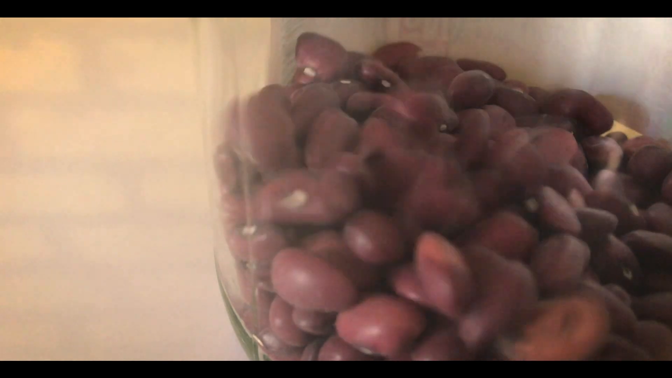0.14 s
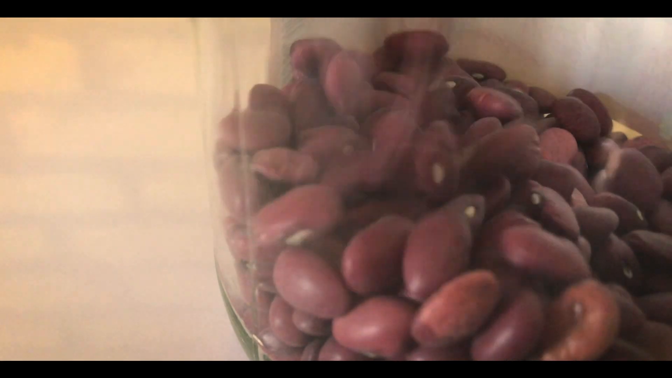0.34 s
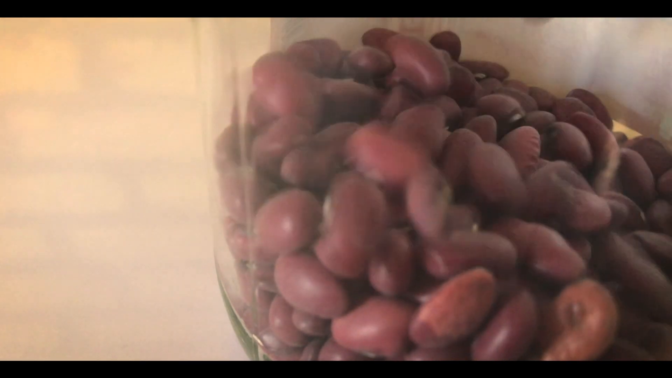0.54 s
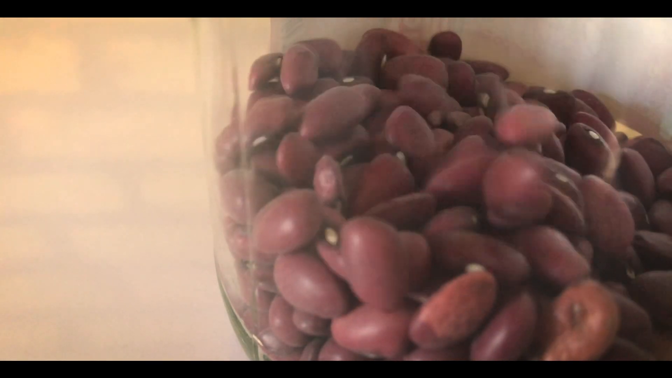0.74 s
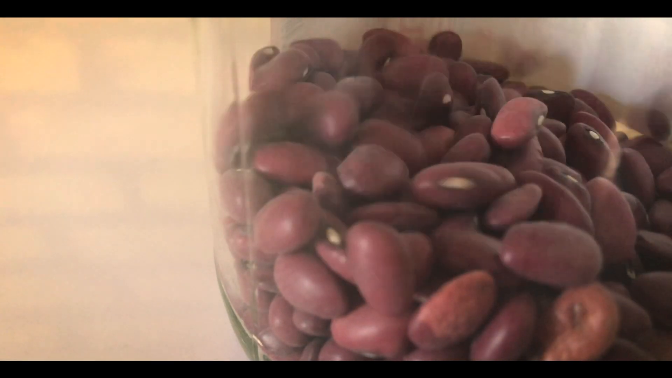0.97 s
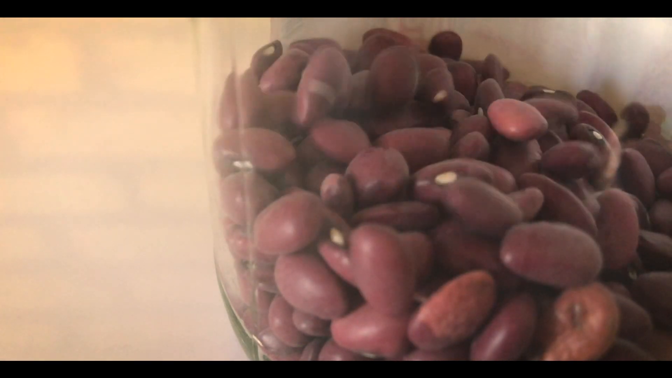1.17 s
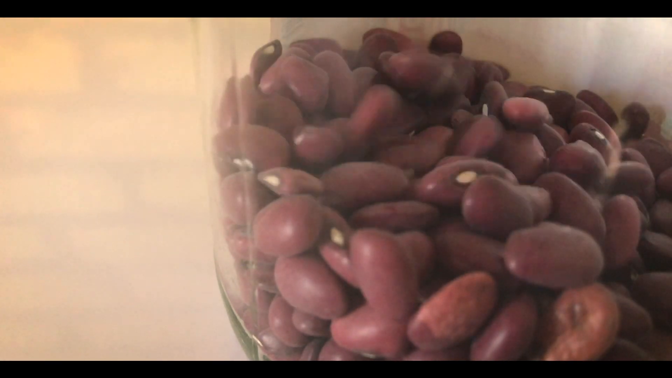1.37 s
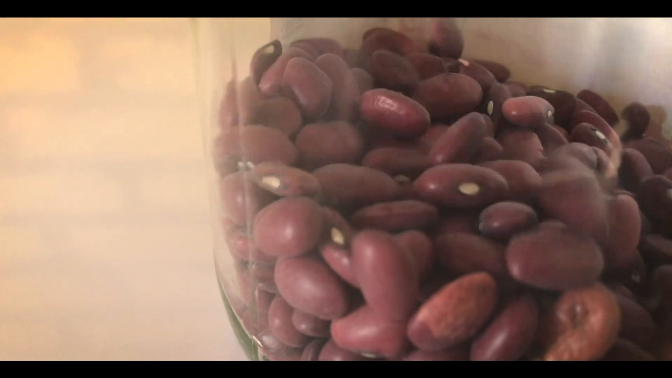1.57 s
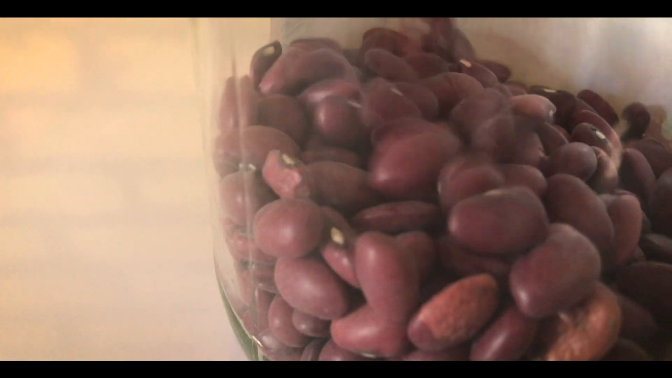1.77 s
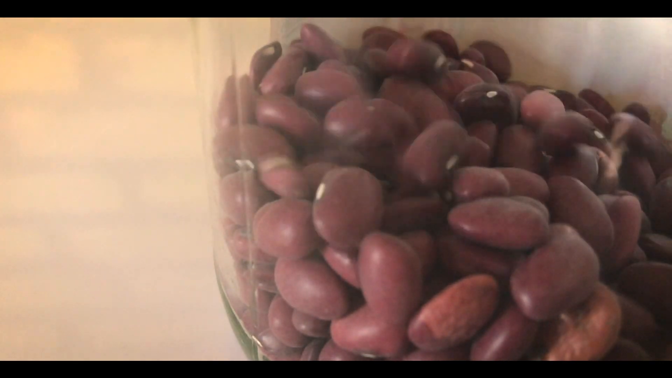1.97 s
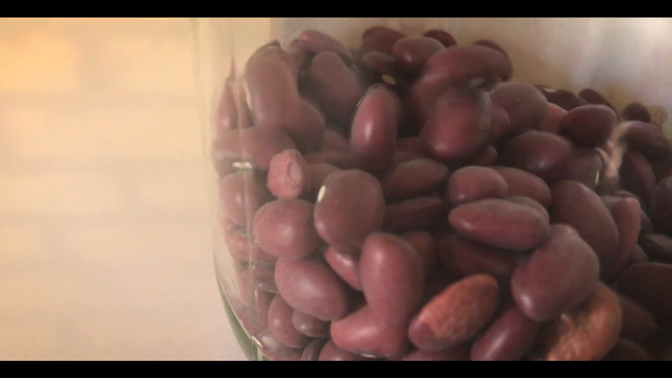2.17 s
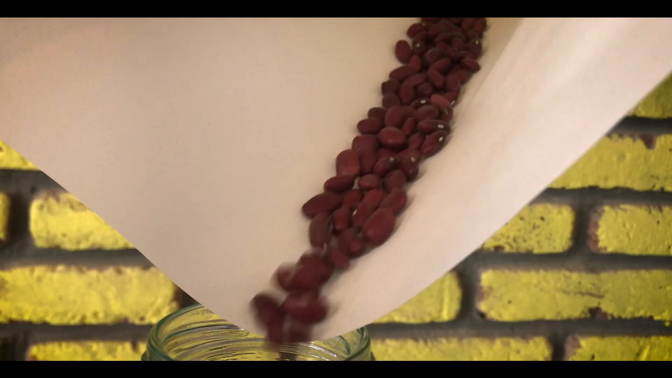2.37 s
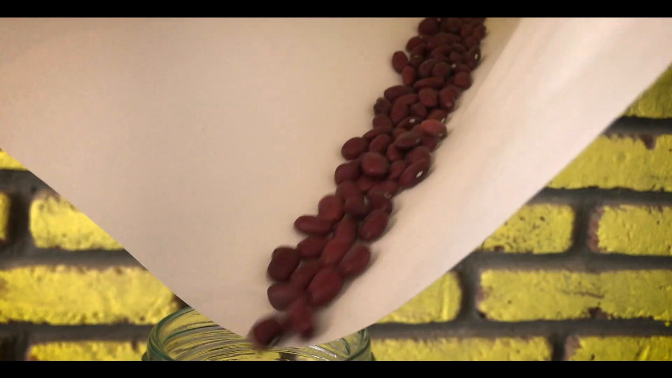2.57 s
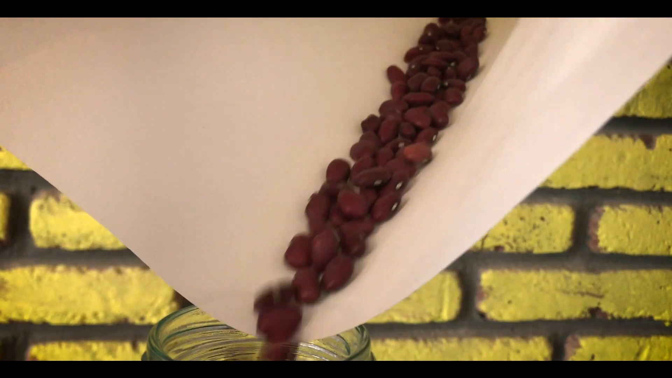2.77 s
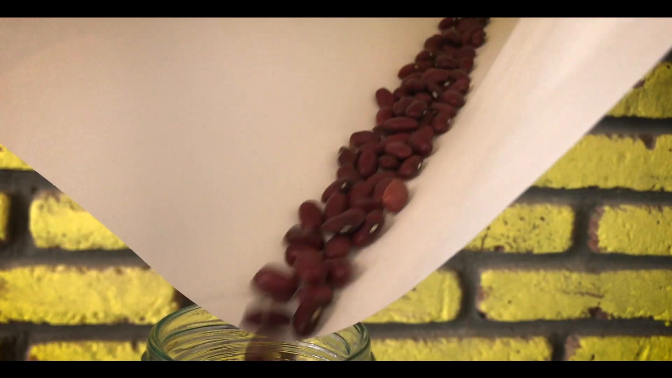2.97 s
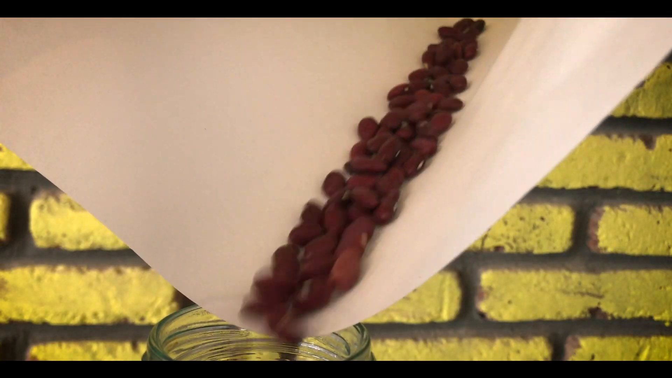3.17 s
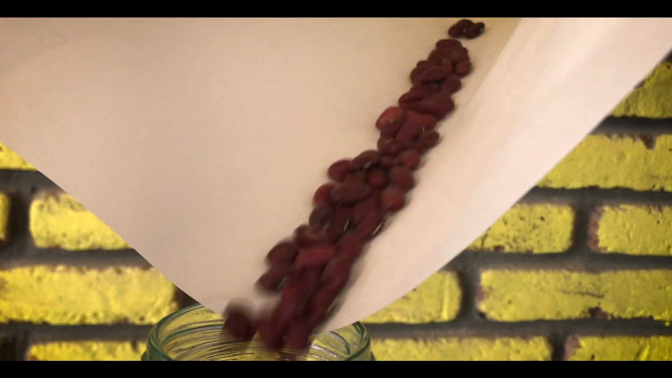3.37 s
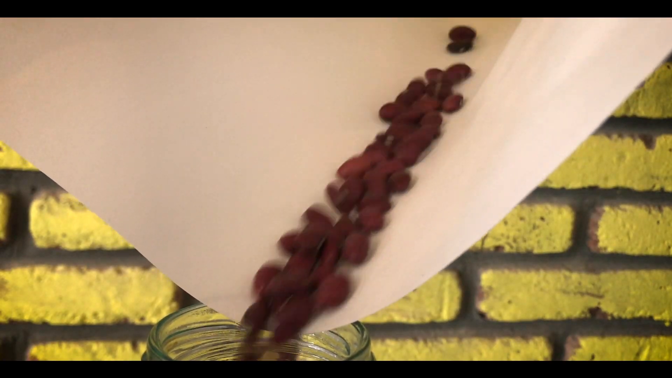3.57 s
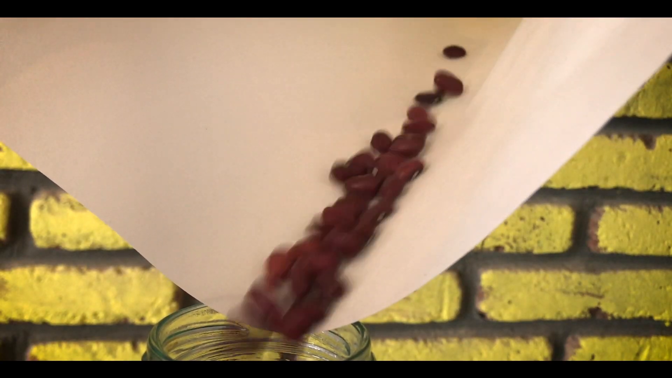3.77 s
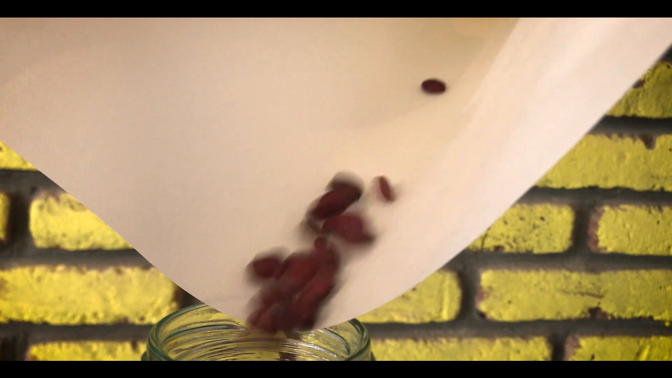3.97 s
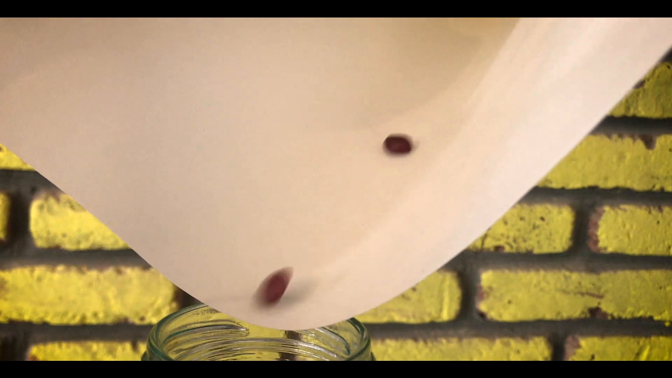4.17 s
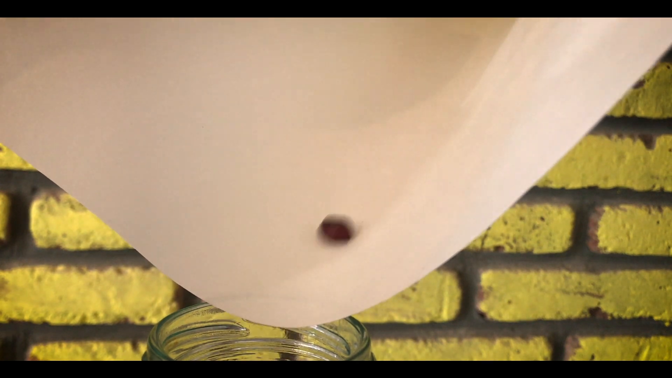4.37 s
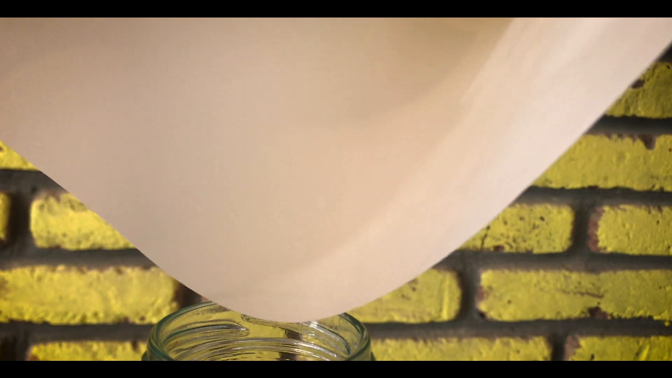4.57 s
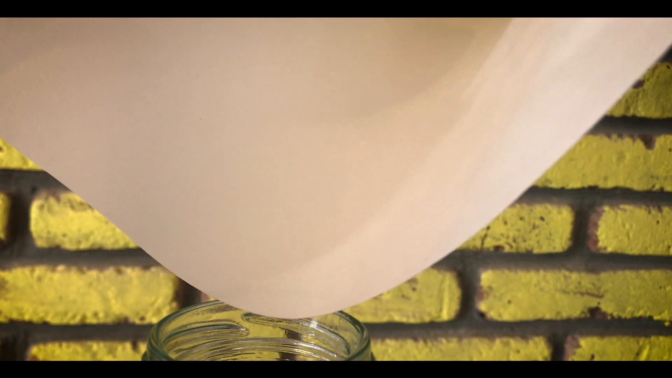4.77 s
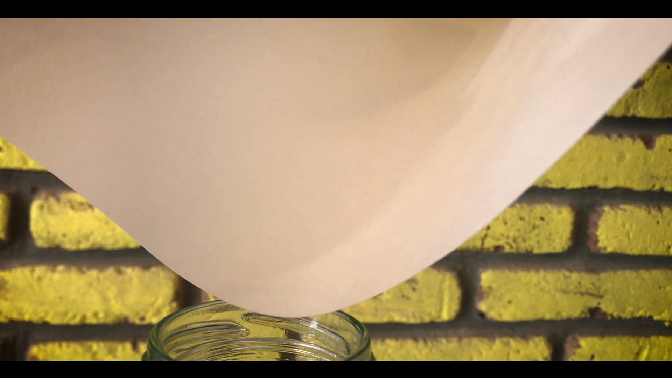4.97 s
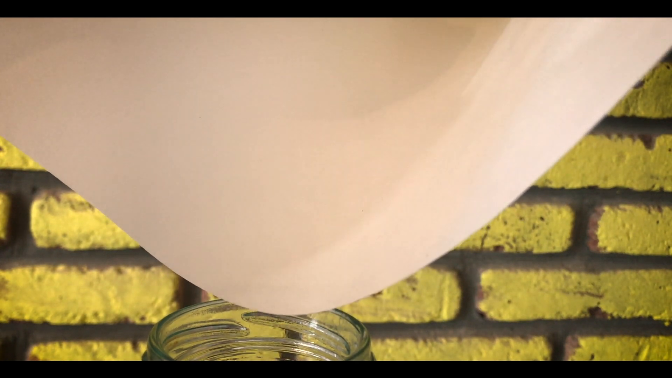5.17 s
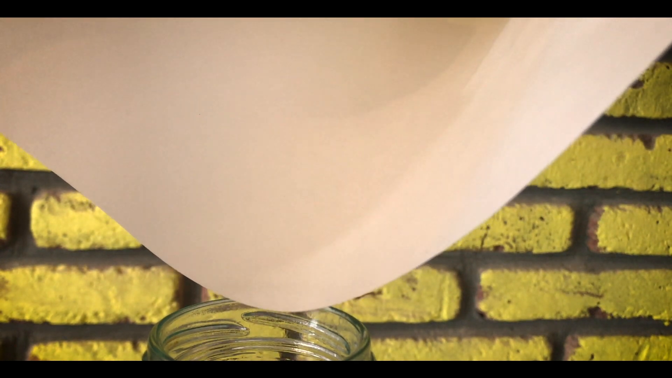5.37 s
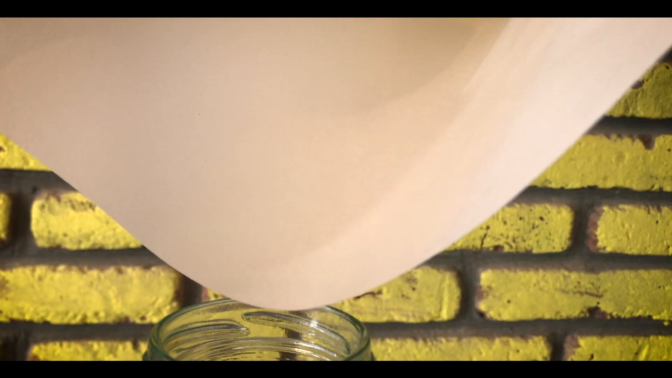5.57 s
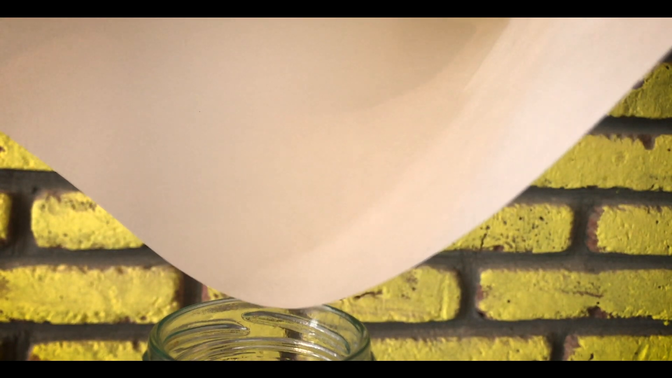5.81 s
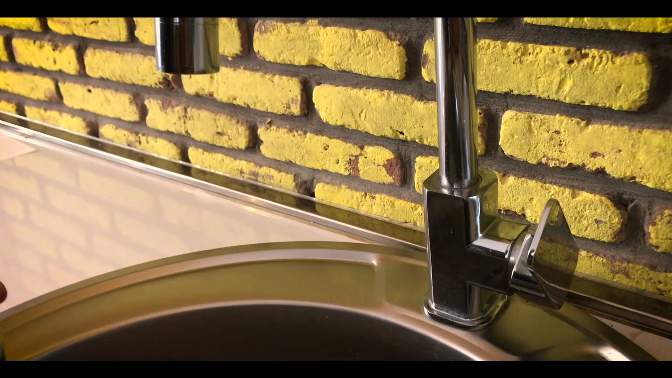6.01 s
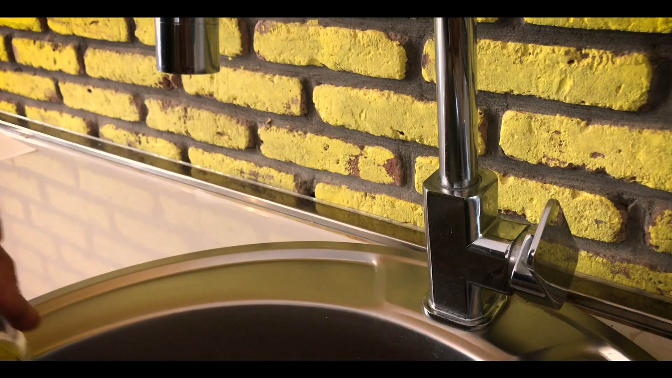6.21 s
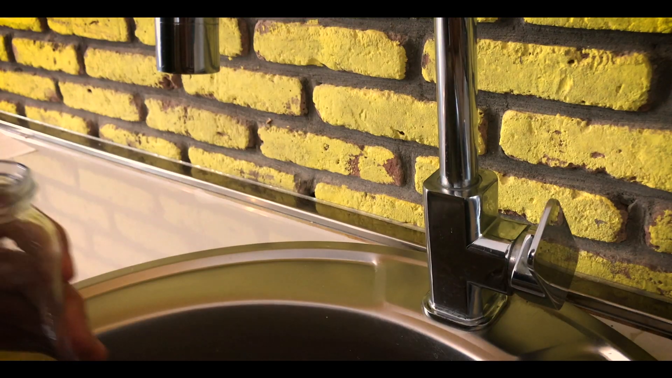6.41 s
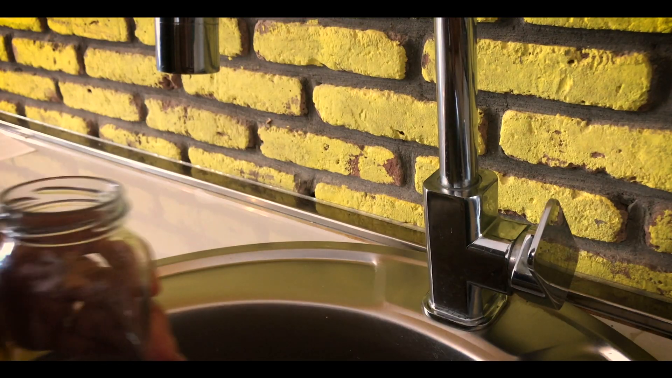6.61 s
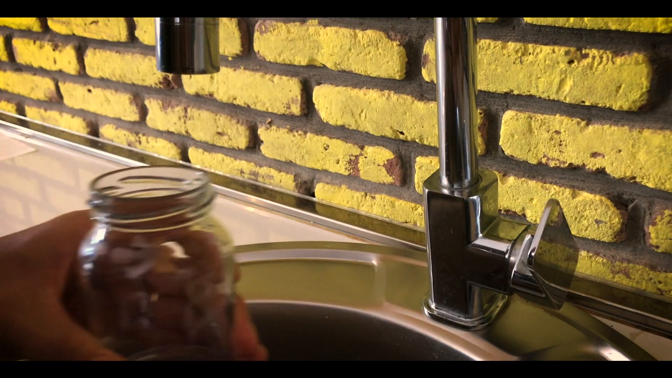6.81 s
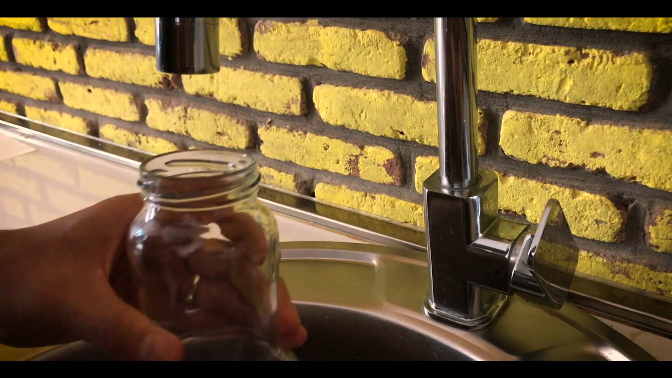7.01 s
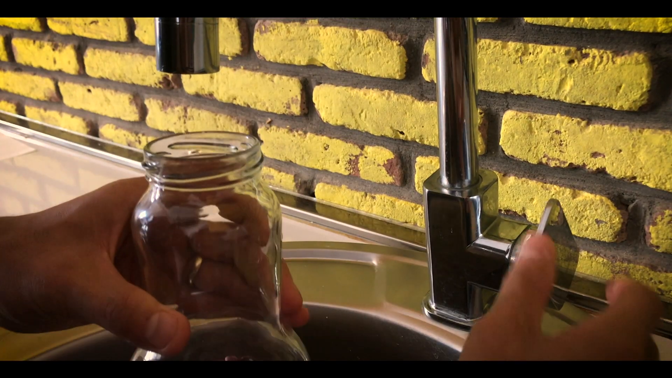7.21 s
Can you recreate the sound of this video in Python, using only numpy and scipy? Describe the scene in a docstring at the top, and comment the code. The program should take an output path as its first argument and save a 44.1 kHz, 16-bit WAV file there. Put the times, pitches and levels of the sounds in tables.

```python
"""Beans poured into a glass jar

Dried kidney beans are poured into a glass jar in a small kitchen. First, by the jar's side, beans clink on
the glass (ringing modes and a noise crack) and thud into a rattling pile (low jar modes and noise bursts).
Then, by its mouth, they slide down a paper chute (showers of tiny noise bursts) and tick against the neck
until a last one drops and bounces. Faint hand brushing and room rumble (filtered noise) and hums remain."""
import sys
import numpy as np
from scipy import signal
from scipy.fft import rfft, irfft
from scipy.io import wavfile

SR = 44100
rng = np.random.default_rng(int(sys.argv[2]) if len(sys.argv) > 2 else 0)


def master(y):
    """Save y as 16-bit WAV."""
    cut = np.clip(np.atleast_2d(y).T, -1, 1)
    pcm = np.round(cut * 32767)  # scale
    wavfile.write(sys.argv[1], SR, pcm.astype(np.int16))


N = 319719
T = np.arange(N) / SR
RING_T = T[:SR // 6]  # every single ring or burst is cut off after a sixth of a second

# In all tables, levels are those before the final mix, room and filters.
# Mode and colour levels are relative: they set the balance inside one sound. t60_s is the time to fall 60 dB.

# beans striking the side of the jar: start_s, peak_db (approximate), treble_share_db
SIDE_HITS = [(0.0275, -7, -8), (0.0413, -15, -17), (0.0669, -7.5, -12), (0.0945, -6.5, -8),
             (0.1173, -6.5, -17.5), (0.1329, -12, -17), (0.144, -4.5, -12), (0.1766, -16.5, -7),
             (0.1985, -8, -15.5), (0.2295, -12.5, -10), (0.259, -9, -11), (0.275, -16.5, -34),
             (0.2825, -11.5, -16.5), (0.2987, -6, -7), (0.3398, -5.5, -15.5), (0.3904, -13, -23),
             (0.4333, -7, -18.5), (0.4638, -9.5, -13), (0.4772, -3.5, -8), (0.5495, -12.5, -17.5),
             (0.579, -16, -17), (0.595, -16.5, -30), (0.6164, -22.5, -28), (0.63, -17, -19),
             (0.7004, -17.5, -18.5), (0.8043, -27.5, -44), (0.821, -28.5, -15), (0.8932, -24.5, -6),
             (0.9173, -9.5, -19), (0.9294, -23, -22), (0.9632, -29.5, -12), (0.9941, -9, -17.5),
             (0.9999, -3, -12), (1.0245, -12, -13), (1.0349, -10, -3), (1.0532, -5, -10),
             (1.0881, -16.5, -29), (1.1491, -6.5, -14.5), (1.2329, -15.5, -18.5), (1.4021, -19, -23.5),
             (1.4698, -26, -12), (1.548, -21.5, -20), (1.571, -19.5, -16.5), (1.6247, -26, -4),
             (1.6611, -9.5, -17), (1.675, -20, -12), (1.7174, -20, -22), (1.7374, -22.5, -21),
             (1.7512, -8, -28), (1.8587, -21.5, -4), (1.8865, -5.5, -19.5), (1.9297, -28, -17),
             (2.0098, -26, -25), (2.0741, -29.5, -25), (2.0886, -23, -20), (2.155, -12, -15),
             (2.1671, -10.5, -18.5), (2.1986, -29.5, -12), (2.264, -28, -27), (2.2755, 0, -13.5),
             (2.294, -17, -13), (2.3355, -26.5, -32), (2.386, -30.5, -17), (2.4358, -12.5, -9)]
# ringing of the glass wall, damped by the beans behind it: pitch_hz, level_db, t60_s
SIDE_MODES = [(2633, -18, .14), (2746, -11, .13), (3214, -2.7, .08), (3897, -7, .08), (4892, 0, .055),
              (6718, -15, .1), (6965, -4, .05), (7390, 0, .04), (7445, 2, .06), (8678, -6, .05),
              (8998, 0, .045), (9430, -13, .05), (10520, -7, .07), (10740, -7, .04), (11470, -13, .06),
              (11615, -6, .04), (11955, 1, .065), (14170, -9, .05), (14370, -13, .07), (14920, -6, .04),
              (15230, -12, .06), (15575, -11, .06)]
# colour of the contact crack, shaped by the wall: frequency_hz, level_db
SIDE_CRACK = [(2200, -25), (3000, -4), (7200, -2.5), (8050, -12), (8900, 5), (9900, -9.5), (11600, 4),
              (13000, -11), (15000, 6.5)]
# colour of the rattling pile: frequency_hz, level_db
PILE_COLOUR = [(40, -26), (260, -1.5), (355, 3), (430, -9), (560, -8.5), (800, -2.5), (1600, -5.5),
               (2300, -2.5), (4500, -6.5), (8000, -14.5)]
SIDE_TREBLE_DB = -14  # treble share of an ordinary blow on the side


def jar_side():
    """Beans clink on the wall, hard or glancing, over the rattle of the settling pile."""
    rattle_gain, graze_gain = pile_flow()
    blows = rocking(strikes(SIDE_HITS, SIDE_TREBLE_DB), second_db=-13)
    clinks = glass(blows, SIDE_MODES, SIDE_CRACK, scatter_db=3.8, detune=.002,
                   crack_db=-6, crack_t60=.036, tick_db=-2.5, linger_db=-31)
    light = light_hits(.02, 2.42, count=140, loudness=graze_gain, spread_db=2.0, dull_db=4.5)
    grazes = glass(light, SIDE_MODES, SIDE_CRACK, scatter_db=4.5, detune=.0024,
                   crack_db=-14, crack_t60=.018, tick_db=-3, linger_db=-23)
    rattle = colour(contacts(rate=400, spread_db=2.2, t60=.02, rubbing=.25), PILE_COLOUR)
    return clinks + grazes + rattle_gain * rattle


# a first rush dies away to a trickle, which slowly thickens again
RUSH_END_S, RUSH_FALL_DB_PER_S = 0.43, 62
TRICKLE_DB, TRICKLE_RISE_DB_PER_S = -32, 10  # flow at 0 s, compared with the rush
SIDE_END_S, SIDE_FALL_DB_PER_S = 2.43, 450
RATTLE_DB, RATTLE_PER_DB = -45, 0.17  # rattle in the rush; its change for each dB of flow
GRAZE_DB = -30.5  # glancing blows on the wall in the rush


def pile_flow():
    """The flow of beans sets the pile's rattle and, more steeply, the glancing blows: two gain curves."""
    rush_db = -RUSH_FALL_DB_PER_S * np.maximum(T - RUSH_END_S, 0)
    flow_db = np.maximum(rush_db, TRICKLE_DB + TRICKLE_RISE_DB_PER_S * T)
    near_db = hold_db(0, SIDE_END_S, 0, SIDE_FALL_DB_PER_S)
    return undb(RATTLE_DB + RATTLE_PER_DB * flow_db + near_db), undb(GRAZE_DB + flow_db + near_db)


CREST_DB = 10.5  # peak of a clink over the level of its first 5 ms
# upward tilt (per 4 kHz) for each dB of treble share above the ordinary; the most tilt a blow may have
TILT_PER_DB, MAX_TILT_DB = 0.74, 0


def strikes(table, ordinary_db):
    """A harder contact has more treble, up to a limit: rows of start_s, level_db, brightness_db."""
    s, peak_db, treble_db = np.transpose(table)
    bright_db = np.minimum(TILT_PER_DB * (treble_db - ordinary_db), MAX_TILT_DB)
    return np.column_stack([s, peak_db - CREST_DB, bright_db])


def rocking(hits, second_db):
    """An oblong bean lands on one end and slaps down, softer and duller, with the other a few ms later."""
    first = np.array(hits)
    delay_s = rng.uniform(.002, .006, len(first))
    second = first + np.outer(delay_s, [1, 0, 0]) + [0, second_db, -1]
    return np.vstack([first, second])


def glass(hits, modes, crack_colour, scatter_db, detune, crack_db, crack_t60, tick_db, linger_db):
    """Each bean strikes another spot, so it weights and detunes the modes anew and adds a noisy crack."""
    hz, db, t60 = np.transpose(modes)
    # the beans soak up most of the ring at once; a weak part lingers in the bare glass
    decays = np.float32([fade(t) + undb(linger_db) * fade(3 * t) for t in t60])
    # a soft contact drives all the low modes alike and loses only the high ones
    height = (np.maximum(hz, 4500) - 8000) / 4000
    attack = int(.005 * SR)
    # the crack starts with a sharp tick
    crack_shape = undb(crack_db) * fade(crack_t60) + undb(tick_db) * fade(.003)
    out = np.zeros(N)
    for s, level_db, bright_db in hits:
        spot, load, sign = rng.standard_normal((3, len(hz)))
        # a long, soft push cancels the treble faster than a short one raises it
        slope_db = bright_db + .5 * min(bright_db, 0)
        weight = undb(db + slope_db * height + scatter_db * spot) * np.sign(sign)
        turn_per_s = np.float32(2 * np.pi * hz * (1 + detune * load))
        rings = np.sin(np.outer(turn_per_s, np.float32(RING_T))) * decays
        ringing = np.float32(weight / np.linalg.norm(weight)) @ rings
        crack = colour(crack_shape * rng.standard_normal(len(RING_T)), crack_colour)
        clink = ringing + undb(min(slope_db, 0)) * crack
        add(out, s, clink * undb(level_db) / np.std(clink[:attack]))
    # the clinks carry little sound below about 1.9 kHz
    return low_cut(out, 1900)


# heavy landings on the pile: start_s, level_db
THUDS = [(0.172, -31.5), (0.625, -31.5), (0.651, -33.5), (0.752, -32.5), (0.82, -33), (0.888, -34),
         (0.929, -33.5), (1.167, -33), (1.233, -33.5), (1.378, -27), (1.402, -36), (1.545, -29.5),
         (1.624, -30), (1.652, -28), (1.713, -35), (1.814, -32.5), (1.926, -33.5), (2.046, -32.5),
         (2.111, -32.5), (2.197, -28)]
# ringing of the filled jar as a whole: pitch_hz, level_db, t60_s
BODY_MODES = [(84, -7.5, .16), (149, -7, 0.13), (258.4, -6, 0.17), (360.4, -4, .24), (508.4, 0, 0.08),
              (582.8, 0.5, 0.076), (641, -2.5, 0.077), (1030, 0.5, 0.029)]
# colour of the shifting pile: frequency_hz, level_db
THUD_COLOUR = [(35, -24.5), (75, -5), (580, 0.5), (6000, -30.5)]
KNOCK_DB = -30.5  # a blow on the wall also knocks the whole jar, this far under its peak


def pile_thuds():
    """Beans landing on the pile or wall knock the jar's low modes and shift the pile; lighter ones patter."""
    hz, mode_db, t60 = np.transpose(BODY_MODES)
    decays = np.array([fade(t) for t in t60])
    body, shift = np.zeros(N), np.zeros(N)
    patter_gain = undb(5.5) * pile_flow()[0]
    patter = light_hits(0, 2.4, count=60, loudness=patter_gain, spread_db=0.0, dull_db=0)[:, :2]
    knocks = [(s, db + KNOCK_DB) for s, db, _ in SIDE_HITS]
    for s, db in np.vstack([THUDS, knocks, patter]):
        spot, load, sign = rng.standard_normal((3, len(hz)))
        weight = undb(mode_db + 2 * spot) * np.sign(sign)
        rings = np.sin(2 * np.pi * np.outer(hz * (1 + .02 * load), RING_T)) * decays
        # both begin 2 ms after the listed moment
        add(body, s + .002, undb(db) * weight / np.linalg.norm(weight) @ rings)
        add(shift, s + .002, undb(db) * fade(.053) * rng.standard_normal(len(RING_T)))
    thuds = undb(-4.5) * body + undb(-12.0) * colour(shift, THUD_COLOUR)
    return low_cut(thuds, 65)


# beans dropping onto the paper: start_s, level_db
PAPER_TAPS = [(3.051, -41), (3.913, -32.5), (4.208, -34.5), (4.725, -51.5)]
# colours of the jostling beans, of their scraping and of the drumming sheet: frequency_hz, level_db
RUSTLE_COLOUR = [(900, -17), (2000, -0.5), (3000, 3.5), (5000, 1), (7000, 2), (7900, -4), (9000, 3.5),
                 (10000, -5), (12000, 0.5), (15500, -0.5)]
SCRAPE_COLOUR = [(400, -3), (1000, 4), (2200, 4), (3200, -17.5), (6000, -7.5)]
SHEET_COLOUR = [(60, -17), (170, -5), (262, 2.5), (335, -9.5), (600, -9), (1500, -45.5)]
# ringing of the glass around the open mouth: pitch_hz, level_db, t60_s
NECK_MODES = [(2660, -11, .08), (2775, -10, .07), (3250, -8, .09), (3885, -9, .08), (4035, -8, .07),
              (4960, -7, .06), (6350, -6, .06), (6860, -7, .035), (7500, -10, .05), (8780, -5, .04),
              (9510, -12, .05), (10700, -5, .03), (11530, 0, .04), (11800, 1, .035), (12400, -5, .025),
              (13020, -2, .03), (14000, 0, .04), (14200, -4, .04), (15260, -1, .04), (15585, -2, .05)]
# colour of the contact crack, shaped by the neck: frequency_hz, level_db
NECK_CRACK = [(700, -22), (2600, -7), (15500, 5)]


def chute():
    """Beans jostle and scrape down the sheet, which drums under them; at its lip they graze the neck."""
    rustle_gain, scrape_gain, drum_gain = chute_flow()
    jostling = contacts(rate=600, spread_db=2.2, t60=.025, rubbing=.2)
    sliding = rustle_gain * colour(jostling, RUSTLE_COLOUR)
    paper = scrape_gain * contacts(rate=800, spread_db=2, t60=.022, rubbing=.3)
    for s, db in PAPER_TAPS:
        add(paper, s, undb(db) * fade(.086) * rng.standard_normal(len(RING_T)))
    sheet = drum_gain * colour(contacts(rate=220, spread_db=2.5, t60=.019), SHEET_COLOUR)
    light = light_hits(2.4, 4.54, count=100, loudness=undb(-2) * rustle_gain, spread_db=0.0, dull_db=2.5)
    grazes = glass(light, NECK_MODES, NECK_CRACK, scatter_db=4, detune=.008,
                   crack_db=-3, crack_t60=.025, tick_db=0, linger_db=-24)
    return sliding + colour(paper, SCRAPE_COLOUR) + sheet + grazes


# the stream swells, holds and runs out; one straggler then slides down alone
CHUTE_START_S, CHUTE_FULL_S, CHUTE_SWELL_DB_PER_S = 2.45, 3.11, 7
START_DB_PER_S, STOP_DB_PER_S = 447.5, 261  # how fast sliding starts and stops
LIP_EMPTY_S, LIP_FALL_DB_PER_S = 3.84, 23.5  # the tumbling at the lip thins out
SHEET_EMPTY_S, SHEET_FALL_DB_PER_S = 4.08, 136  # the last of the stream leaves the paper
STRAGGLER_DB, STRAGGLER_OFF_S = -11, 4.53  # scrape of the straggler, compared with the full stream
DRUM_END_S, DRUM_FALL_DB_PER_S = 4.35, 82
RUSTLE_DB, SCRAPE_DB, DRUM_DB = -35.5, -43.5, -53  # levels at full flow


def chute_flow():
    """One stream drives rustle, scrape and drumming, which die away in turn: three gain curves."""
    sliding_db = hold_db(CHUTE_START_S, STRAGGLER_OFF_S, START_DB_PER_S, STOP_DB_PER_S)
    lip_db = hold_db(CHUTE_FULL_S, LIP_EMPTY_S, CHUTE_SWELL_DB_PER_S, LIP_FALL_DB_PER_S)
    stream_db = hold_db(CHUTE_FULL_S, SHEET_EMPTY_S, CHUTE_SWELL_DB_PER_S, SHEET_FALL_DB_PER_S)
    sheet_db = np.maximum(stream_db, STRAGGLER_DB)
    drum_db = hold_db(0, DRUM_END_S, 0, DRUM_FALL_DB_PER_S)
    return undb(sliding_db + np.array([RUSTLE_DB + lip_db, SCRAPE_DB + sheet_db, DRUM_DB + drum_db]))


# beans striking the neck, ending with a straggler and its two bounces:
# start_s, peak_db (approximate), treble_share_db
NECK_HITS = [(2.6221, -16.5, -10.5), (2.843, -17.5, -11), (2.8974, -16, -8), (3.0966, -14.5, -6.5),
             (3.1276, -19, -6), (3.2567, -17.5, -7), (3.275, -20.5, -12), (3.4195, -24, -13),
             (3.456, -33, -9), (3.6292, -18.5, -10.5), (3.6596, -14, -11), (3.6834, -20, -7),
             (3.705, -15.5, -4), (3.7147, -16.5, -8), (3.7773, -28, -4), (3.807, -16, -7),
             (3.8454, -13.5, -2), (3.8743, -15, -5), (3.916, -22.5, -14), (3.976, -14, -2),
             (4.041, -14.5, 0), (4.0908, -17.5, -3), (4.1272, -16, -11), (4.1366, -16, -2),
             (4.2081, -17.5, -9.5), (4.2209, -21, -8), (4.2629, -17.5, -9), (4.2774, -19, -7),
             (4.313, -22, -11), (4.3387, -24.5, -13), (4.3615, -29, -13.5), (4.4172, -27.5, -7),
             (4.4477, -34, -13), (4.5062, -26, -13.5), (4.575, -48, -28), (4.7233, -20.5, -1),
             (4.794, -38, 0), (4.866, -43.5, -7)]
NECK_TREBLE_DB = -9.5  # treble share of an ordinary blow on the neck


def jar_neck():
    """Dry ticks on the neck; each also stirs the air in the jar, which hums through its mouth."""
    blows = rocking(strikes(NECK_HITS, NECK_TREBLE_DB), second_db=-3)
    out = glass(blows, NECK_MODES, NECK_CRACK, scatter_db=3.5, detune=.01,
                crack_db=0, crack_t60=.042, tick_db=-12, linger_db=-22)
    air = np.sin(2 * np.pi * 262 * RING_T) * fade(.083)  # 262 Hz
    for s, db, _ in NECK_HITS:
        add(out, s, undb(db - 26.5) * air)
    return undb(-0.65) * out


# beans snapping against each other in the air, with no ring: start_s, peak_db
SNAPS = [(2.4755, -25), (2.5955, -20), (2.743, -17), (3.3985, -20), (4.1125, -23), (4.2525, -18)]


def snaps():
    """Hard skins meet in the falling stream: a few loud, needle-sharp ticks among many small ones."""
    out = np.zeros(N)
    small_gain = undb(8) * chute_flow()[0]
    small = light_hits(2.45, 4.54, count=60, loudness=small_gain, spread_db=3, dull_db=0)[:, :2]
    shape = fade(.002) + undb(-12) * fade(.015)
    for s, db in np.vstack([SNAPS, small]):
        tick = colour(shape * rng.standard_normal(len(RING_T)), NECK_CRACK)
        add(out, s, undb(db) * tick / np.abs(tick).max())
    return out


# beans catching the very rim, which sings: start_s, level_db
RIM_PINGS = [(3.952, -37), (4.088, -29.5), (4.168, -26)]
# the rim's own ring: pitch_hz, level_db, t60_s
RIM_MODES = [(6297, 0, .15), (11960, -6, .07), (14020, -2.5, .09)]


def rim():
    """A clean blow on the rim leaves a pure, high ring: a few fading sines."""
    out = np.zeros(N)
    ring = sum(undb(db) * np.sin(2 * np.pi * hz * RING_T) * fade(t60) for hz, db, t60 in RIM_MODES)
    for s, db in RIM_PINGS:
        add(out, s, undb(db) * ring)
    return out


def kitchen(x, t60, wet_db):
    """Counter and walls return a short diffuse tail: fading, coloured noise."""
    t = T[:SR // 2]
    # the tail begins after 6 ms
    tail = rng.standard_normal(len(t)) * np.exp(-np.log(1000) * t / t60) * (t > .006)
    tail = colour(tail, [(100, 10.5), (3500, -9), (8000, -12), (16000, -7)])
    return x + undb(wet_db) * signal.fftconvolve(x, tail / np.linalg.norm(tail))[:N]


# moves of the hand on paper and jar: peak_s, rise_s, fall_s, level_db
HAND_MOVES = [(5.6, .15, 0.24, -72.5), (5.79, 0.019, 0.019, -65), (6.45, 0.44, 0.37, -75),
              (6.98, 0.38, 0.33, -71.5)]


def hand_moves():
    """Each move swells and ebbs like a bell curve: the gain curve of the brushing."""
    power = np.zeros(N)
    for s, rise, fall, db in HAND_MOVES:
        bell = np.exp(-((T - s) / np.where(T < s, rise, fall)) ** 2)
        power += (undb(db) * bell) ** 2
    return np.sqrt(power)


# colours of the brushing hand and of the room rumble: frequency_hz, level_db
HANDLING_COLOUR = [(200, -15), (370, 9.5), (1800, 4.5), (16000, -7)]
ROOM_COLOUR = [(20, -15), (78, 1.5), (115, -1.5), (190, -12.5), (222, -4.5), (290, -18), (750, -25.5),
               (885, -16.5), (1100, -28.5), (16000, -47)]


def background():
    """Low room rumble is steady filtered noise; the hand's soft brushing is a dense shower of contacts."""
    rumble = undb(-63.5) * colour(rng.standard_normal(N), ROOM_COLOUR)
    brushing = colour(contacts(rate=1700, spread_db=0, t60=.024), HANDLING_COLOUR)
    return rumble + hand_moves() * brushing


# faint hums in the room: start_s, end_s, first_pitch_hz, last_pitch_hz, level_db, fall_per_overtone_db
HUMS = [(4.8, 6.25, 43, 62, -60.5, 3), (6, 7.1, 76, 73, -61, 19), (6.09, 6.57, 1814, 1814, -81, 40)]


def hums():
    """Each hum, a tone with two overtones, swells and fades while moving from its first to its last pitch."""
    out = np.zeros(N)
    for start, end, first_hz, last_hz, db, fall_db in HUMS:
        phase = 2 * np.pi * np.cumsum(np.interp(T, [start, end], [first_hz, last_hz])) / SR
        swell = np.sin(np.pi * np.interp(T, [start, end], [0, 1]))
        out += swell * sum(undb(db - k * fall_db) * np.sin((k + 1) * phase) for k in range(3))
    return out


def contacts(rate, spread_db, t60, rubbing=.2):
    """A shower of tiny uneven contacts (rate per second), each a short burst, over steady rubbing; rms 1."""
    strength = undb(spread_db * np.minimum(rng.standard_exponential(N), 4))
    struck = rng.random(N) < rate / SR
    power = signal.fftconvolve(struck * strength ** 2, fade(t60) ** 2)[:N]
    return unit(np.sqrt(np.abs(power + rubbing * power.mean())) * rng.standard_normal(N))


def light_hits(start, end, count, loudness, spread_db, dull_db):
    """Light blows at random moments, following a gain curve: rows of start_s, level_db, brightness_db."""
    chance = rng.standard_normal((count, 2))
    s = start + (end - start) * (np.arange(count) + 2 * rng.random(count)) / (count + 1)
    db = 20 * np.log10(np.interp(s, T, loudness) + 1e-9)
    return np.column_stack([s, db + spread_db * chance[:, 0], 2 * chance[:, 1] - dull_db])


def hold_db(start, end, rise_db_per_s, fall_db_per_s):
    """Rise to 0 dB at start, hold, and fall from end."""
    return -rise_db_per_s * np.maximum(start - T, 0) - fall_db_per_s * np.maximum(T - end, 0)


def fade(t60):
    """An exponential decay, falling 60 dB in t60 seconds."""
    return np.exp(-np.log(1000) * RING_T / max(t60, 1e-3))


def colour(x, points):
    """Filter through (Hz, dB) points, with no sound ahead of its cause (minimum phase)."""
    hz, db = np.transpose(points)
    size = 4096
    grid = np.maximum(np.fft.rfftfreq(size, 1 / SR), 1)
    cepstrum = irfft(np.log(undb(np.interp(np.log(grid), np.log(hz), db))))
    # folding the cepstrum forward in time makes the filter causal
    cepstrum[1:size // 2] *= 2
    cepstrum[size // 2 + 1:] = 0
    response = irfft(np.exp(rfft(cepstrum)))
    return signal.fftconvolve(x, response / np.linalg.norm(response))[:len(x)]


def low_cut(x, hz):
    """Weaken everything below a frequency."""
    return signal.sosfilt(signal.butter(3, hz, "high", fs=SR, output="sos"), x)


def add(out, s, sound):
    """Mix a sound in at time s."""
    i = int(np.clip(s * SR, 0, N - 1))
    out[i:i + len(sound)] += sound[:N - i]


def undb(db):
    """Decibels to gain."""
    return 10 ** (np.asarray(db) / 20)


def unit(x):
    """Scale to rms 1."""
    return x / np.sqrt(np.mean(x ** 2))


def scene():
    """All sources in the kitchen, mono."""
    beans = jar_side() + pile_thuds() + chute() + snaps() + jar_neck() + rim()
    return (kitchen(beans, t60=.32, wet_db=-22.5) + background() + hums())[None]


CUT_OFF_HZ = 15750


def record(dry):
    """The recorder thins the deepest bass and cuts the top steeply."""
    thinned = low_cut(dry, 38)
    return signal.sosfilt(signal.ellip(10, .2, 70, CUT_OFF_HZ, fs=SR, output="sos"), thinned)


dry = scene()
out = record(dry)
master(out)
```